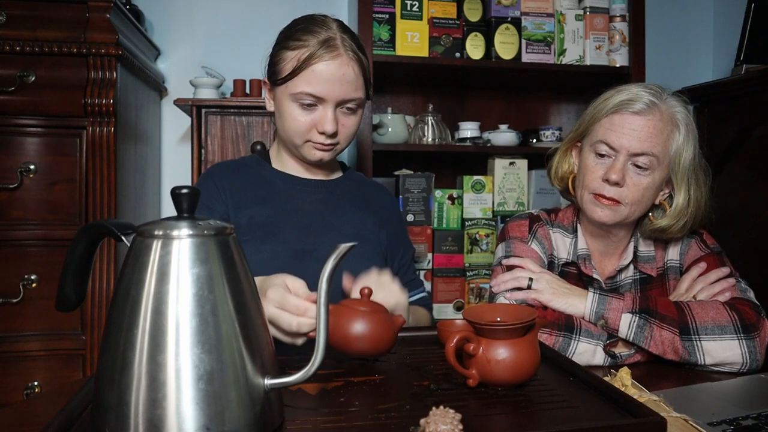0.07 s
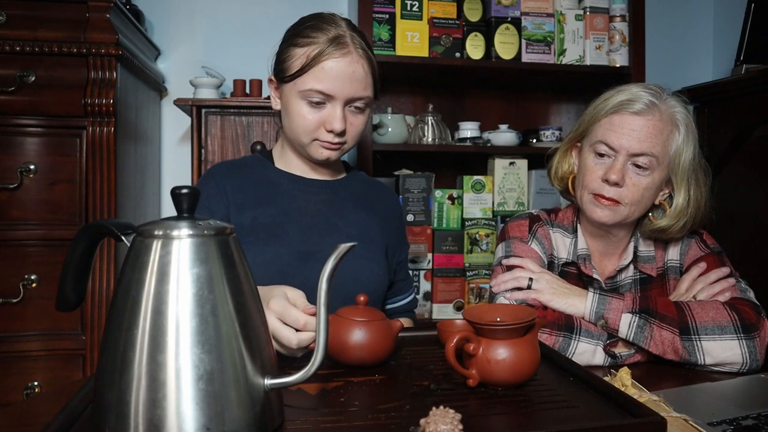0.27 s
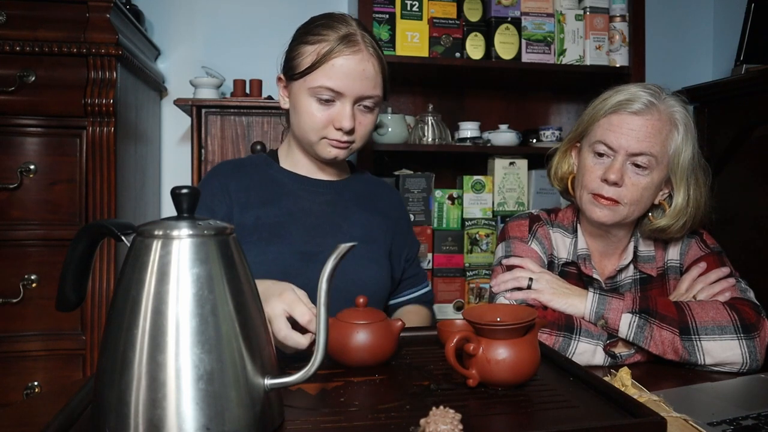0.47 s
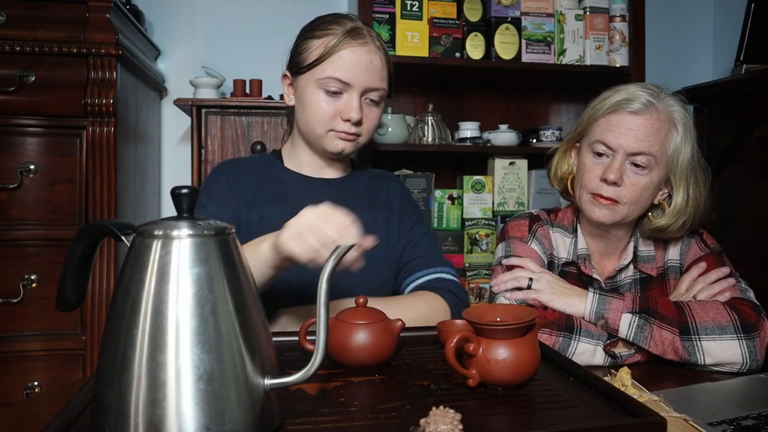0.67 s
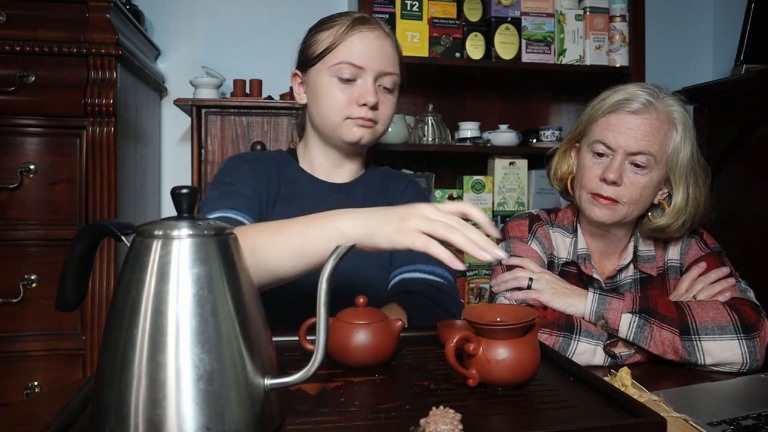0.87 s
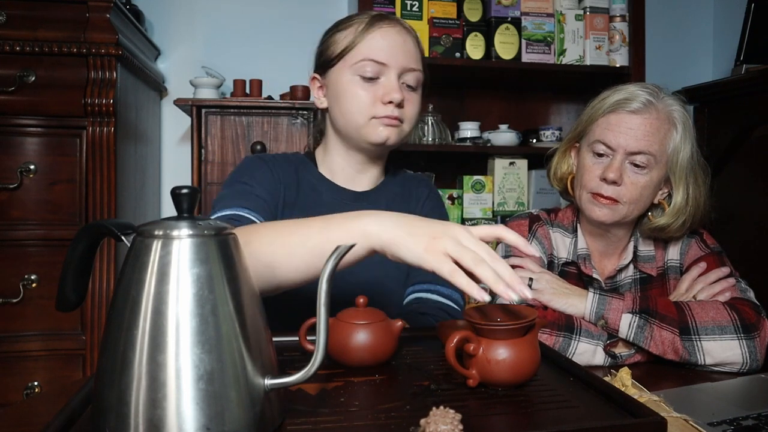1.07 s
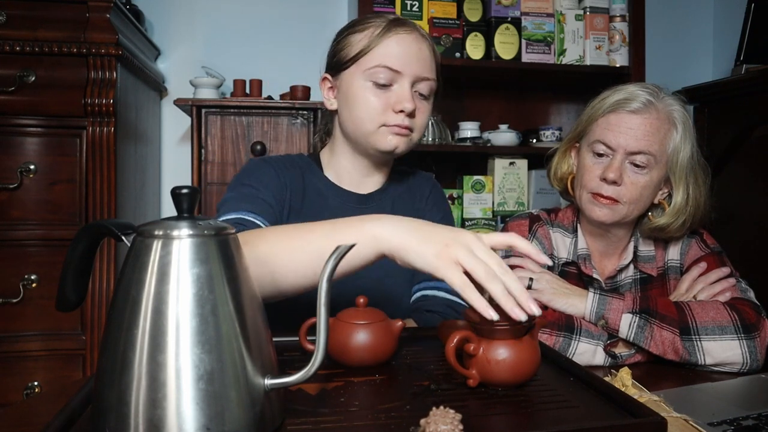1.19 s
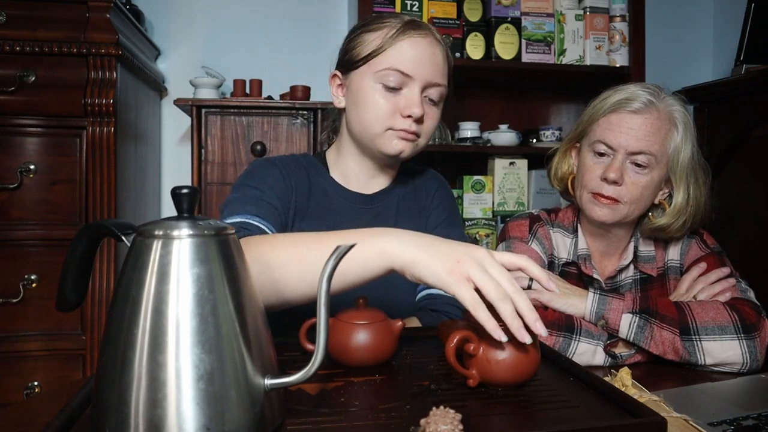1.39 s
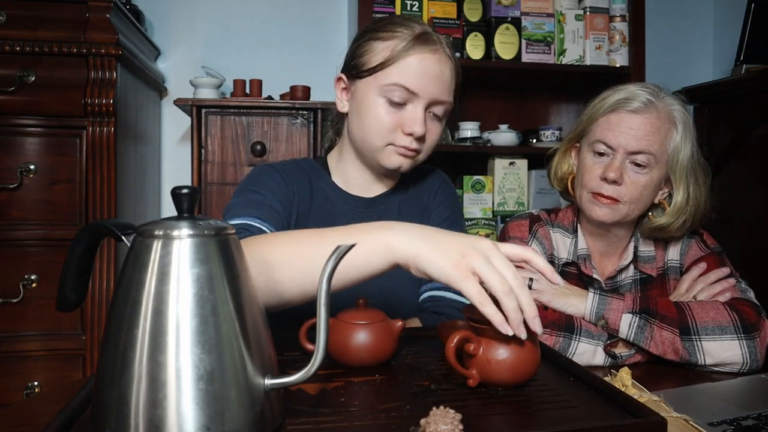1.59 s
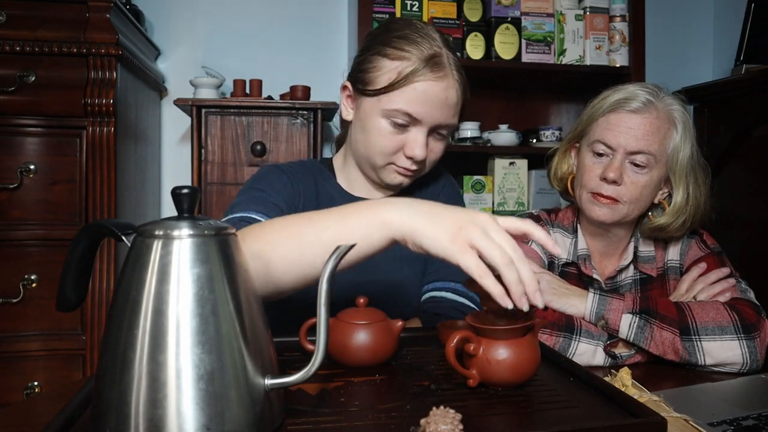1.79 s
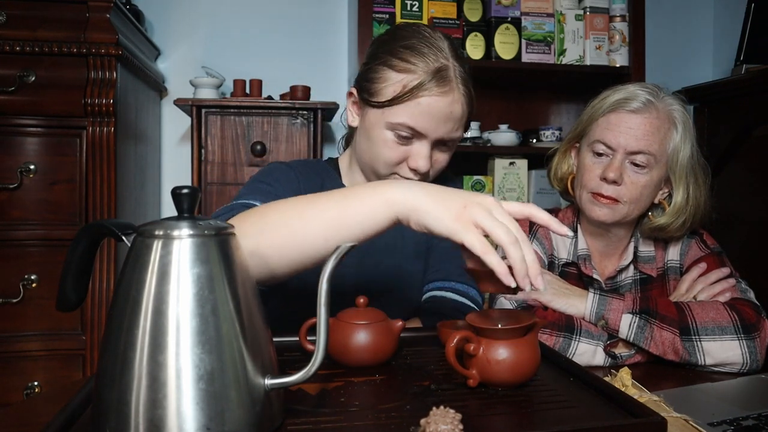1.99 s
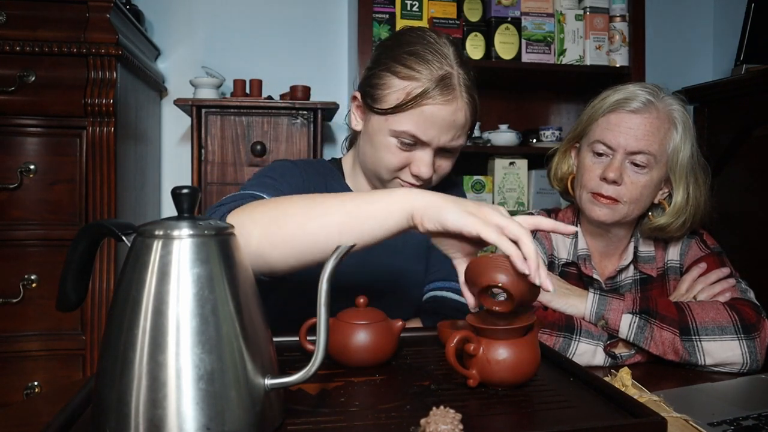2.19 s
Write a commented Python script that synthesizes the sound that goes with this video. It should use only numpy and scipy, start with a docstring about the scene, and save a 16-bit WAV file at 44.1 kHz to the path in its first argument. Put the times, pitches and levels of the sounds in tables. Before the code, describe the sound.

A small clay teapot lands on a wooden tray with a sharp clack and lid rattle, then slides and settles. A sleeve rustles faintly, and a pitcher's clay lid ticks and grates near the microphone in a quiet room.

```python
"""A wooden tea tray in a small quiet room, on one microphone. At 0.2 s a small clay teapot is set down:
the blow overloads the microphone and the loose lid rattles. The foot slides and settles with a knock
at 0.46 s. An arm reaches over, sleeve rustling, and bumps the table from 1.1 s. Nearer the microphone
a hand lands on a pitcher, whose clay lid grates and ticks on the rim until it comes away around 2 s."""
import sys
import numpy as np
from scipy import signal
from scipy.fft import rfft, irfft, next_fast_len
from scipy.io import wavfile
from scipy.ndimage import uniform_filter1d

SR = 44100
rng = np.random.default_rng(int(sys.argv[2]) if len(sys.argv) > 2 else 0)


def materialize(psi):
    """Save the field psi as 16-bit PCM at rate SR to the path in sys.argv[1].

    A 1-D psi becomes a single channel; in a 2-D psi each row is a channel.
    """
    bounded = np.clip(np.atleast_2d(psi).T, -1, 1)
    quanta = np.round(bounded * 32767).astype(np.int16)
    wavfile.write(sys.argv[1], SR, quanta)


N = 99225
T = np.arange(SR) / SR  # one second, the span of a single contact

ROOM_TONE_COLOUR = [(12, -30), (20, 5), (146, -1), (187, -4), (255, 0.5), (1030, -19.5), (1910, -26),
                    (2140, -19), (2820, -26.5), (12100, -36), (16000, -50.5)]  # the still room: frequency_hz, gain_db
ROOM_DECAY = [(80, 0.6), (400, 0.33), (1000, 0.37), (4000, 0.26), (9000, 0.18), (15000, 0.041)]  # the room's tail: frequency_hz, t60_s

TABLE_SWAYS = [(0.458, -40.5, 19.6, 1.03), (1.069, -36, 58.6, 0.29), (1.166, -33, 22.07, 1.24),
               (1.412, -38, 19.6, 1.55)]  # the table rocking: start_s, level_db, pitch_hz, t60_s
ARM_BUMPS = [(1.088, -46), (1.125, -51), (1.174, -38.5), (1.211, -49.5), (1.664, -47)]  # the arm against the table: start_s, level_db
BUMP_SPECTRUM = [(20, -36.5), (70, 2.5), (160, -2), (350, 2), (700, -17), (2000, -27), (8000, -87)]  # a soft bump: frequency_hz, gain_db
SLEEVE_LEVELS = [(0, -72.5), (.13, -64.5), (.3, -62), (.64, -66.5), (.675, -64), (.8, -78), (.95, -66.5),
                 (1.12, -62.5), (1.21, -53.5), (1.33, -60.5), (1.55, -70), (1.85, -64.5), (2.1, -75.5),
                 (2.25, -67)]  # the course of the rustle: time_s, level_db
CLOTH_SPECTRUM = [(100, 0.5), (400, 9), (900, 0.5), (1500, 1), (2300, 0.5), (3300, -5), (4800, -5),
                  (7000, -12.5), (11000, -19), (16000, -28.5)]  # rubbing cloth: frequency_hz, gain_db

HAND_THUDS = [(1.088, -63, 320), (1.168, -37, 396)]  # the hand landing on the pitcher: start_s, level_db, pitch_hz
LID_TICKS = [(1.174, -41, .5), (1.361, -49.5, -1.5), (1.577, -48, -3.5), (1.5862, -40, -2.5),
             (1.673, -50, 2), (1.680, -44, -3.5), (1.706, -44, 0), (1.7803, -41.5, -2.5), (1.783, -41, 2),
             (1.803, -49.5, 1.5), (1.821, -46, -0.5), (1.8949, -51, 0.5), (1.8986, -31.5, 5.5),
             (1.951, -38.5, 2), (1.954, -48, 1.5), (1.987, -48, -0.5), (2.075, -55, -8)]  # the pitcher's lid on its rim: start_s, level_db, tilt_db_per_octave
TICK_SPECTRUM = [(100, 1), (500, 11), (1500, 2), (3200, 0.5), (5000, -5.5), (7000, -11.5), (10000, -19),
                 (16000, -36)]  # clay touching clay: frequency_hz, gain_db
PITCHER_MODES = [(548, -9, 0.09), (1000, -5, 0.09), (1225, -6, 0.16), (1410, 0, 0.045), (1860, -6, 0.11),
                 (2600, -9, .09), (3040, 2, 0.035), (3590, -6, 0.045), (4400, -3, 0.03)]  # the pitcher ringing: pitch_hz, gain_db, t60_s
# strokes of the lid on the rim: peak_s, half_length_s, grating_db, resonance_hz, resonance_db, squeak_db
LID_GRATES = [(1.42, 0.01, -88, 4220, -68, -71), (1.464, 0.0028, -43, 2000, -34, -56),
              (1.471, 0.0042, -43, 1830, -39, -57), (1.587, 0.002, -39.5, 1805, -38, -60),
              (1.632, 0.0084, -47, 2830, -55, -54), (1.698, 0.011, -51.5, 4050, -66, -70),
              (1.944, 0.013, -62, 3510, -52.5, -99)]
RIM_RESONANCES = [(533, 360, -5), (893, 107, 6), (1270, 54, 2.5), (1904, 105, 3.5), (2885, 180, 0),
                  (4100, 210, -1.5), (4960, 140, -2.5), (5760, 290, -10.5)]  # the rubbed rim: centre_hz, width_hz, gain_db
SQUEAK_RESONANCES = [(8890, 140, 10.5), (9500, 150, -2), (14550, 200, -9)]  # the lid's high squeak: centre_hz, width_hz, gain_db
LID_LIFT = [(1.9, -55), (1.945, -56.5), (2.04, -70.5)]  # the lid brushing the rim as it comes away: time_s, level_db

FOOT_KNOCKS = [(0.2022, -1.5, 1.3, 0.023), (0.2069, -7.5, -1.9, 0.023), (0.2215, -11.5, -4, 0.049),
               (0.4530, -30.5, -8.5, 0.04), (0.4564, -21, 1, 0.043), (0.459, -19, -5.5, 0.051),
               (0.4667, -22, -9.5, 0.074)]  # the teapot on the tray: start_s, level_db, tilt_db_per_octave, t60_s
KNOCK_SPECTRUM = [(30, -28.5), (110, -10), (200, -3.5), (480, -2), (1150, 0), (2200, -1.5), (3100, -1),
                  (5000, -7), (7000, -17.5), (11000, -23.5), (16000, -42)]  # clay striking wood: frequency_hz, gain_db
# the tray ringing, with a low boom of the room: pitch_hz, gain_db, t60_s
TRAY_AND_ROOM_MODES = [(81.14, -16, 0.5), (114, -19.5, 0.37), (180, -13, 0.23), (255.9, -11, 0.1),
                       (435, -6.5, .07), (535, -11, 0.062), (746.4, -5.5, 0.12), (942, -11, 0.12),
                       (1409, 0, .04), (1685, 2.5, .04), (2631, 0.5, .026), (2990, 2.5, .026),
                       (3346, 0, 0.03)]
FOOT_SLIDE = [(.33, -66), (.385, -52.5), (.415, -44), (.449, -42), (.462, -52.5)]  # the teapot sliding on the tray: time_s, level_db
FOOT_RESONANCES = [(490, 200, -1), (1850, 700, -1), (2860, 240, 7), (3370, 170, 6), (5080, 220, 4),
                   (5930, 300, -5), (7300, 900, -10), (9330, 250, -11)]  # the scraping foot: centre_hz, width_hz, gain_db
POT_WALL_RINGS = [(0.2084, -45.5), (.4565, -60)]  # the teapot's wall set ringing: start_s, level_db
LID_RATTLES = [(0.2084, -15.5), (0.2125, -11.5), (0.2219, -13.5), (0.2266, -15.5), (0.2305, -16),
               (.4570, -41), (0.4663, -41.5)]  # the teapot's lid jumping in its seat: start_s, level_db
POT_LID_MODES = [(1340, -12, .03), (2060, -11, 0.05), (2850, -9, .03), (4360, -11, .035), (4780, -10, 0.05),
                 (5120, -15, 0.04), (5820, -11, .035), (6750, -16, 0.026), (8640, -4, .022),
                 (8850, 1.5, .03), (9090, -15, .17), (9345, -22, .17), (9950, -24, .12), (14340, -11, .06)]  # that lid ringing: pitch_hz, gain_db, t60_s
CLICK_SPECTRUM = [(200, -14.5), (1500, 3.5), (4000, -3), (7000, -7.5), (11000, -9), (16000, -29)]  # that lid's click: frequency_hz, gain_db


def amp(db):
    """Decibels to gain."""
    return 10 ** (np.asarray(db) / 20)


def unit(x):
    """Scale to rms 1."""
    return x / np.sqrt(np.mean(x ** 2) + 1e-20)


def along(points, hz):
    """Interpolate (frequency_hz, value) points on a log axis."""
    frequencies, values = np.transpose(points)
    return np.interp(np.log(hz + 1), np.log(frequencies + 1), values)


def level(rows):
    """Gain per sample from (time_s, level_db) points, silent outside them."""
    return amp(np.interp(np.arange(N) / SR, *np.transpose(rows), left=-np.inf, right=-np.inf))


def filtered(x, response):
    """Pass x through a frequency response."""
    size = next_fast_len(len(x) + SR // 4)
    return irfft(rfft(x, size) * response(np.fft.rfftfreq(size, 1 / SR)), size)[:len(x)]


def tilted(hz, tilt_db):
    """Harder contacts lift the treble, softer ones dull it, by tilt_db per octave."""
    return amp(tilt_db * np.log2(np.maximum(hz, 500) / 1500))


def noise(colour, tilt_db=0, size=SR):
    """Coloured noise of rms 1."""
    white = rng.standard_normal(size)
    return unit(filtered(white, lambda hz: amp(along(colour, hz)) * tilted(hz, tilt_db)))


def fade(t60):
    """Exponential decay, 60 dB down after t60 seconds."""
    return np.exp(-np.log(1000) * T / t60)


def ring(modes, tilt_db=0, detune=0.0028):
    """Damped modes of alternating sign; each contact shifts their pitch and level a little."""
    out = np.zeros(SR)
    for k, (hz, db, t60) in enumerate(modes):
        gain = (-1) ** k * amp(db + rng.normal()) * tilted(hz, tilt_db)
        pitch_hz = hz * (1 + detune * rng.normal())
        out += gain * fade(t60) * np.sin(2 * np.pi * pitch_hz * T)
    return out


def friction(resonances, slips_per_s):
    """Tiny random slips exciting resonances, rms 1."""
    slips = (rng.random(N) < slips_per_s / SR) * rng.standard_normal(N)
    cutoff_hz = 1.46 * resonances[-1][0]

    def body(hz):
        peaks = sum((-1) ** k * amp(db) * 1j * hz * width / (centre ** 2 - hz ** 2 + 1j * hz * width)
                    for k, (centre, width, db) in enumerate(resonances))
        return peaks / (1 + (hz / cutoff_hz) ** 4)
    return unit(filtered(slips, body))


def add(out, start_s, x):
    """Mix x in at start_s."""
    part = out[max(round(start_s * SR), 0):][:len(x)]
    part += x[:len(part)]


def room_tone(level_db=-61.5):
    """The faint, low, steady noise of the place."""
    return amp(level_db) * noise(ROOM_TONE_COLOUR, size=N)


def room_answer(x, early_db=-10, tail_db=-15, delay_s=0.0061):
    """Early reflections from the tray and furniture, then a tail that dies faster in the treble."""
    arrived = T > delay_s
    hz, t, spectrum = signal.stft(rng.standard_normal(SR), SR, nperseg=256)
    decay = amp(-60 * t / along(ROOM_DECAY, hz)[:, None])
    tail = signal.istft(spectrum * decay, SR, nperseg=256)[1][:SR] * arrived
    early = rng.standard_normal(SR) * (rng.random(SR) < .03) * fade(t60=0.12) * arrived
    response = amp(tail_db) * tail / np.linalg.norm(tail) + amp(early_db) * early / np.linalg.norm(early)
    return signal.fftconvolve(x, response)[:N]


def table():
    """The table rocks slowly and takes soft bumps from the arm."""
    out = np.zeros(N)
    for start_s, db, hz, t60 in TABLE_SWAYS:
        sway = amp(db) * np.sin(2 * np.pi * hz * T) * fade(t60)
        add(out, start_s, sway * (1 - T))  # hastens the decay to silence at one second
    attack = 1 - np.exp(-T / 0.00072)
    for start_s, db in ARM_BUMPS:
        add(out, start_s, amp(db) * noise(BUMP_SPECTRUM) * fade(t60=0.23) * attack)
    return out


def sleeve():
    """Cloth rustles unevenly as the arm moves."""
    flutter_db = 1.7 * unit(uniform_filter1d(rng.standard_normal(N), size=500))
    return level(SLEEVE_LEVELS) * unit(noise(CLOTH_SPECTRUM, size=N) * amp(flutter_db))


def pitcher(tick_rise_s=0.00069):
    """The hand lands; the lid ticks, grates round the rim in short strokes and brushes it on leaving."""
    t = np.arange(N) / SR
    out = level(LID_LIFT) * noise(TICK_SPECTRUM, tilt_db=4.5, size=N)
    for start_s, db, hz in HAND_THUDS:
        add(out, start_s, amp(db) * np.sin(2 * np.pi * hz * T) * fade(t60=0.058))
    attack = 1 - np.exp(-T / tick_rise_s)
    for start_s, db, tilt_db in LID_TICKS:
        clay = amp(-10.5) * ring(PITCHER_MODES, tilt_db)
        click = amp(4.5) * noise(TICK_SPECTRUM, tilt_db) * fade(t60=0.019)
        add(out, start_s, amp(db) * (clay + click) * attack)
    for peak_s, half_length_s, grating_db, hz, resonance_db, squeak_db in LID_GRATES:
        stroke = np.exp(-.5 * ((t - peak_s) / half_length_s) ** 2)
        grating = amp(grating_db) * friction(RIM_RESONANCES, slips_per_s=5100)
        resonance = amp(resonance_db) * friction([(hz, 220, 0)], slips_per_s=2600)
        squeak = amp(squeak_db) * friction(SQUEAK_RESONANCES, slips_per_s=3900)
        out += stroke * (grating + resonance + squeak)
    return out


def teapot(wall_hz=4300, damped_at_s=0.69):
    """The foot knocks on the tray and slides; the wall rings until damped and the loose lid rattles."""
    out = level(FOOT_SLIDE) * friction(FOOT_RESONANCES, slips_per_s=4000)
    for start_s, db, tilt_db, t60 in FOOT_KNOCKS:
        blow = noise(KNOCK_SPECTRUM, tilt_db) * fade(t60)
        ring_and_boom = amp(-12) * ring(TRAY_AND_ROOM_MODES, tilt_db)
        add(out, start_s, amp(db) * (blow + ring_and_boom))
    wall = np.sin(2 * np.pi * wall_hz * T) * fade(t60=0.73)
    for start_s, db in POT_WALL_RINGS:
        damping = np.clip((damped_at_s - start_s - T) / .02, 0, 1)
        add(out, start_s, amp(db) * wall * damping)
    for start_s, db in LID_RATTLES:
        lid = ring(POT_LID_MODES, detune=0.004)
        click = amp(5.0) * noise(CLICK_SPECTRUM) * fade(t60=0.0065)
        add(out, start_s, amp(db) * (lid + click))
    return out


def scene():
    """What reaches the microphone: clay, wood and cloth over a faint room tone."""
    pot, jug = teapot(), pitcher()
    reflections = room_answer(pot + amp(-2) * jug)  # the pitcher stands nearer, so it is drier
    return (pot + jug + reflections + table() + sleeve() + room_tone())[None]


def record(dry):
    """The microphone clips the hardest peaks and rolls off outside its band."""
    low_hz, top_hz = 8, 15900
    clipped = dry[0] / (1 + np.abs(dry[0]) ** 8) ** (1 / 8)
    return filtered(clipped, lambda hz: 1j * hz / (low_hz + 1j * hz) / (1 + (hz / top_hz) ** 120))[None]


dry = scene()
out = record(dry)
materialize(out)
```